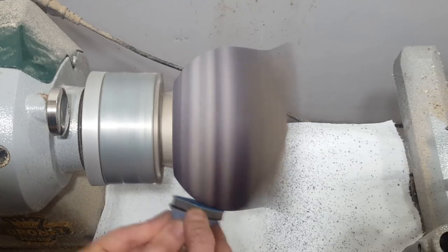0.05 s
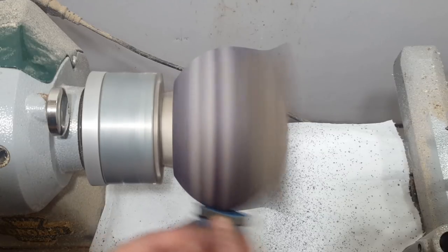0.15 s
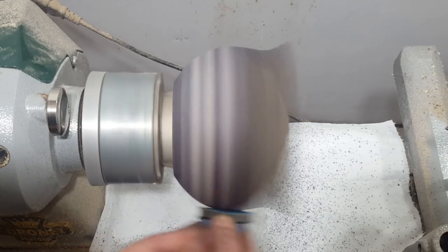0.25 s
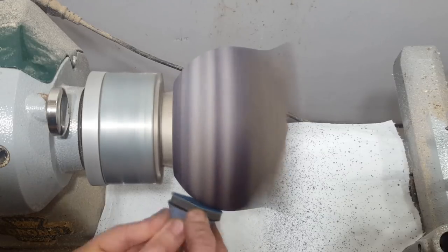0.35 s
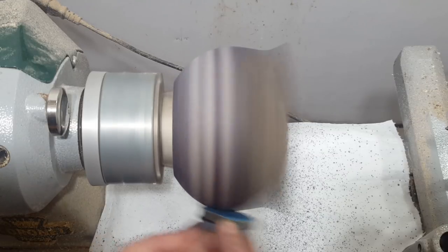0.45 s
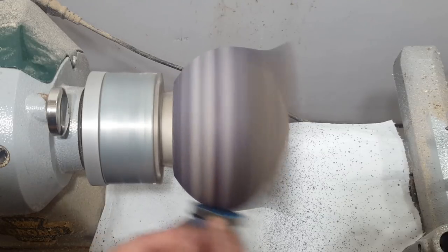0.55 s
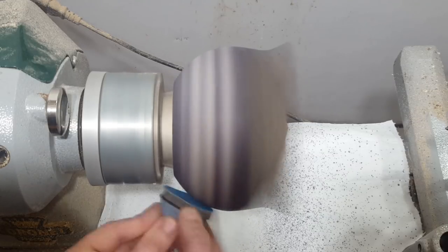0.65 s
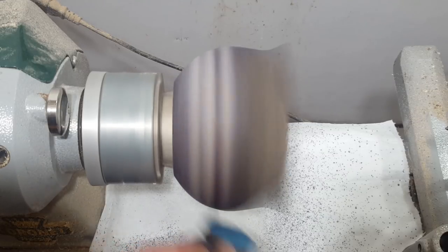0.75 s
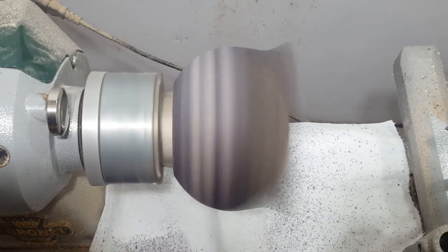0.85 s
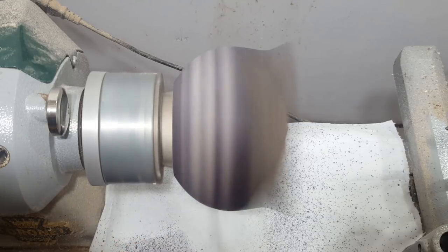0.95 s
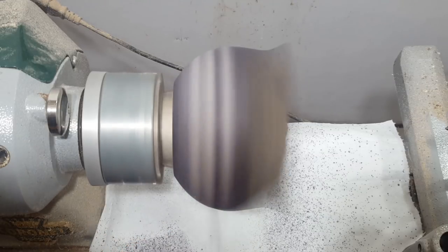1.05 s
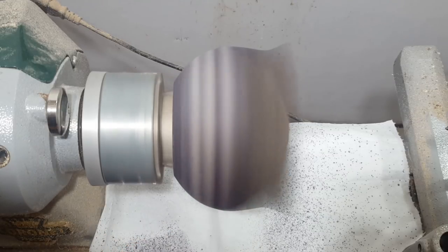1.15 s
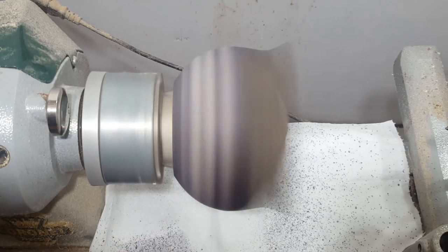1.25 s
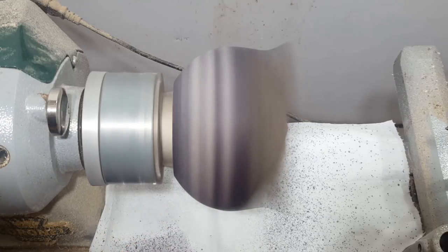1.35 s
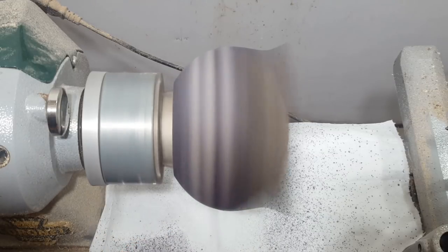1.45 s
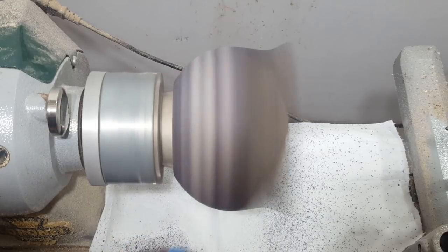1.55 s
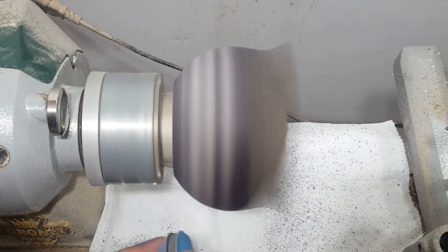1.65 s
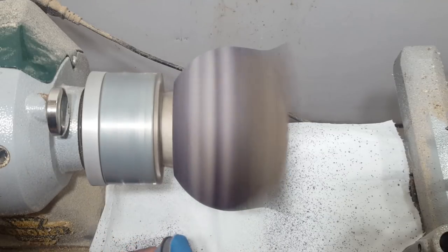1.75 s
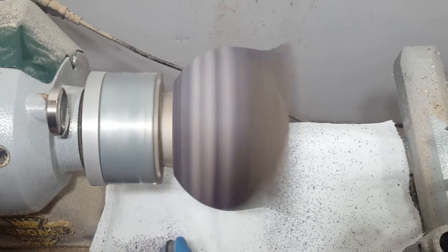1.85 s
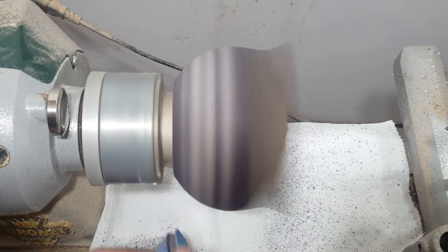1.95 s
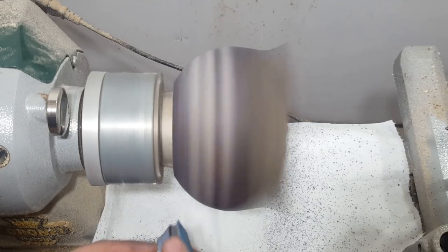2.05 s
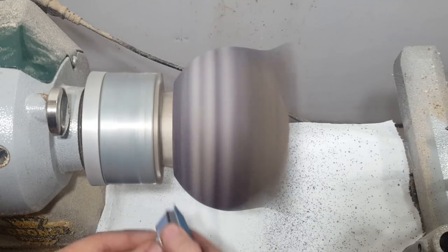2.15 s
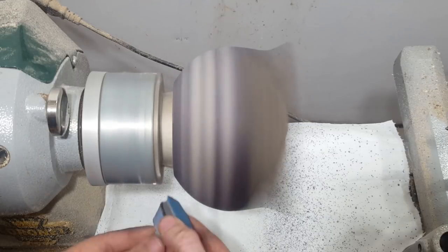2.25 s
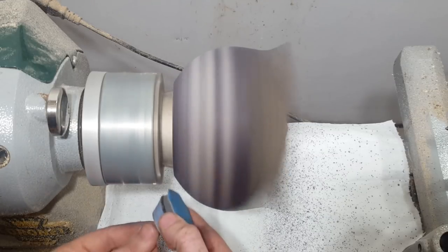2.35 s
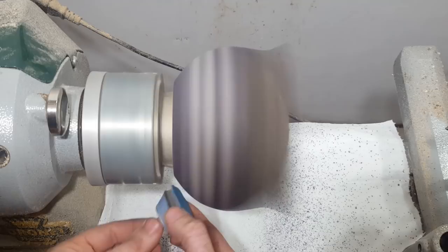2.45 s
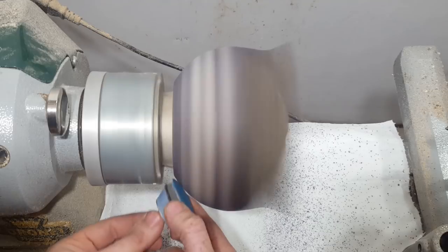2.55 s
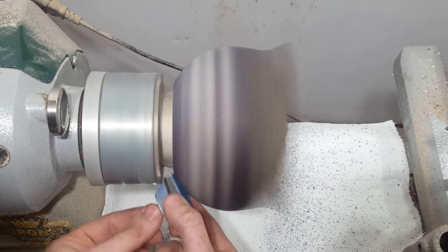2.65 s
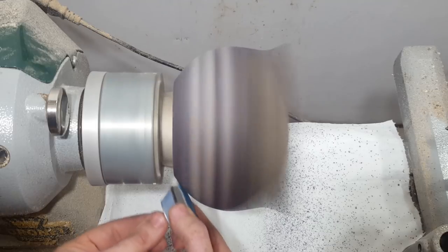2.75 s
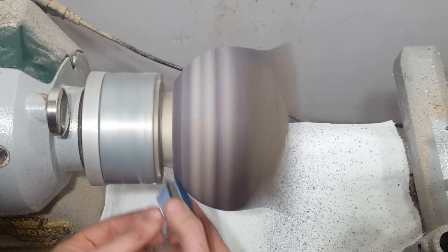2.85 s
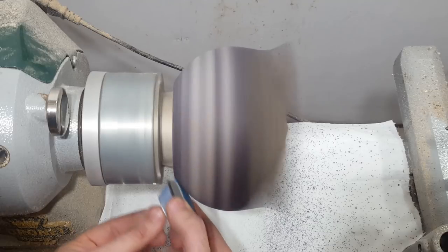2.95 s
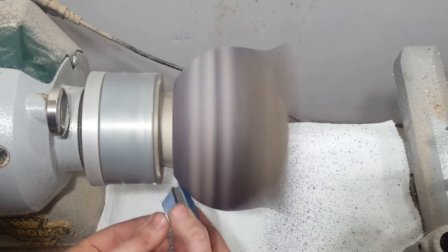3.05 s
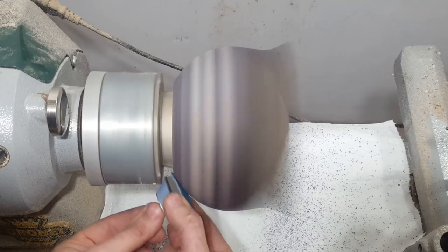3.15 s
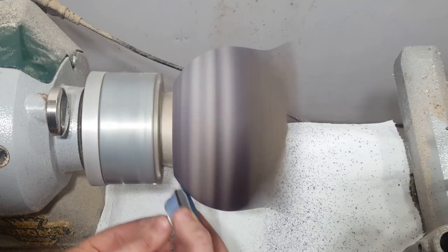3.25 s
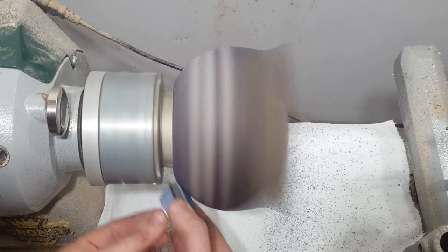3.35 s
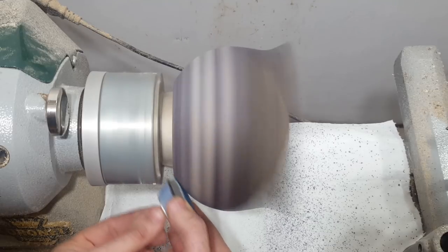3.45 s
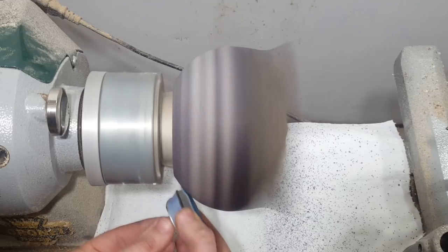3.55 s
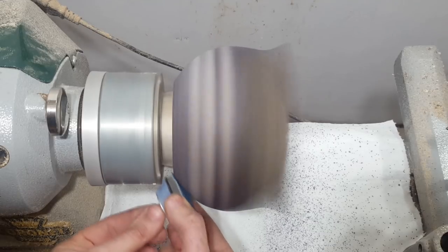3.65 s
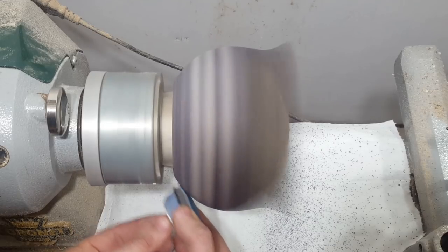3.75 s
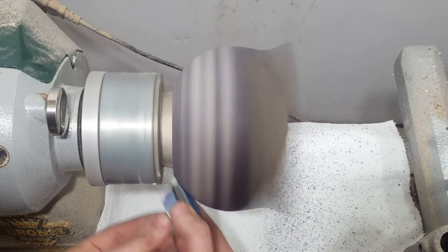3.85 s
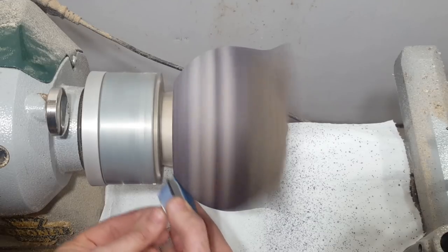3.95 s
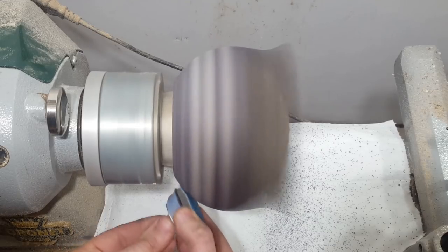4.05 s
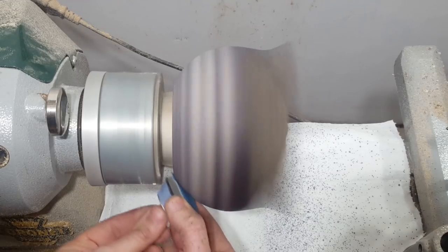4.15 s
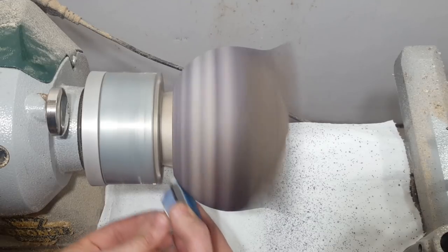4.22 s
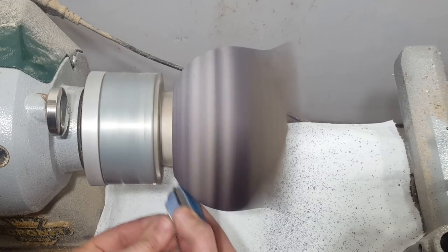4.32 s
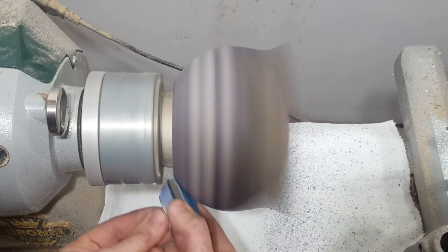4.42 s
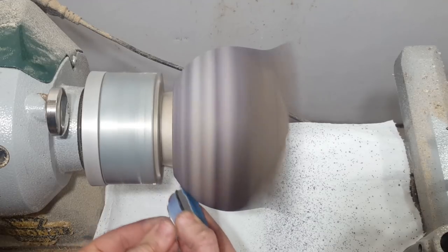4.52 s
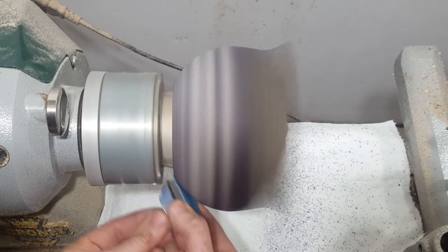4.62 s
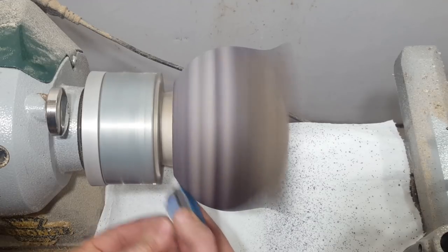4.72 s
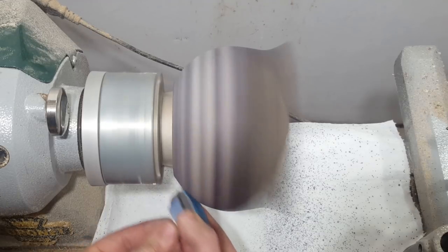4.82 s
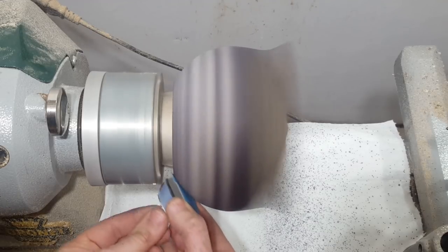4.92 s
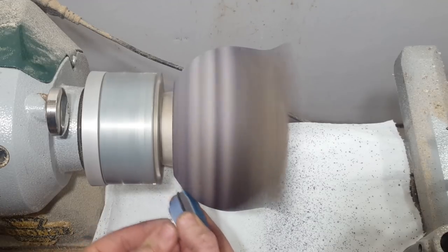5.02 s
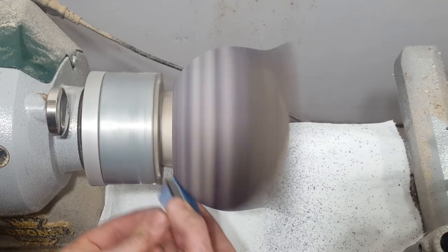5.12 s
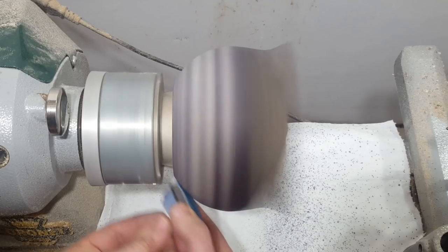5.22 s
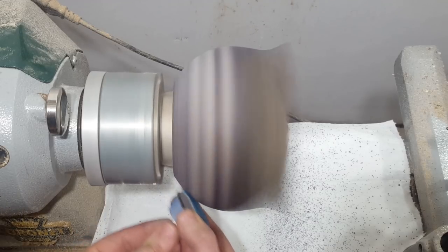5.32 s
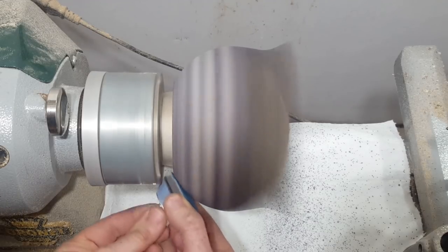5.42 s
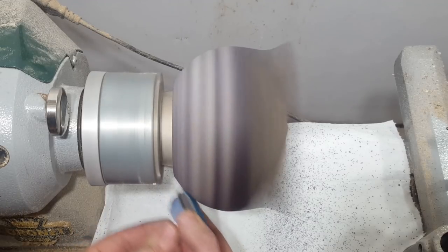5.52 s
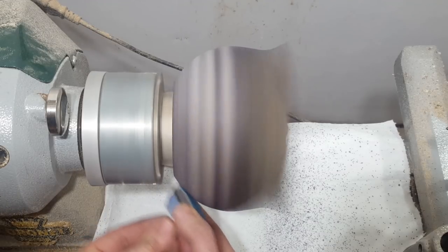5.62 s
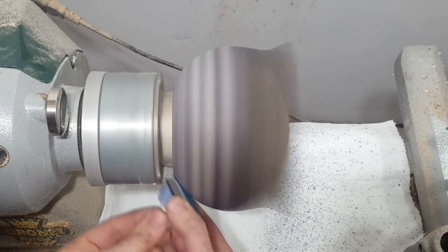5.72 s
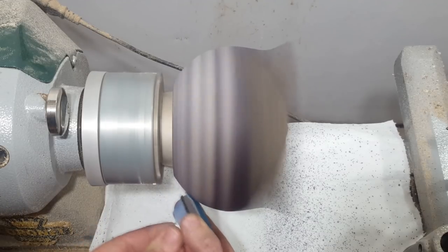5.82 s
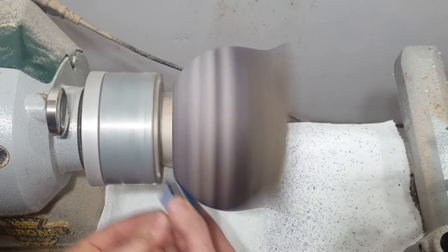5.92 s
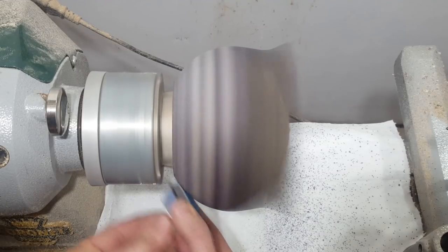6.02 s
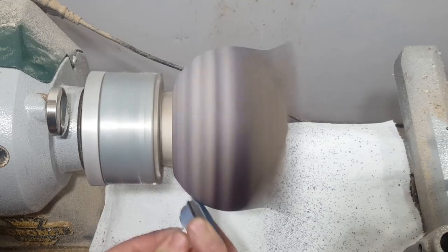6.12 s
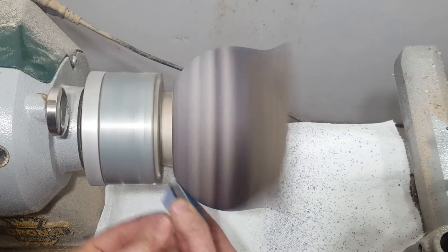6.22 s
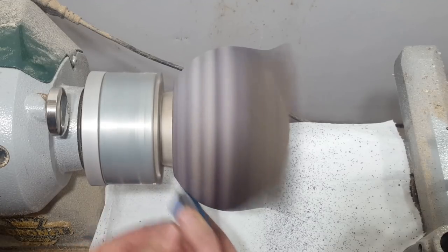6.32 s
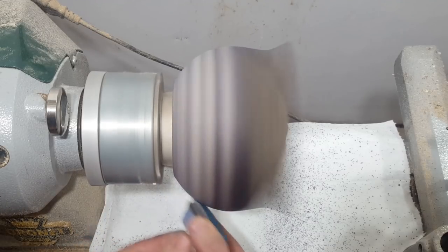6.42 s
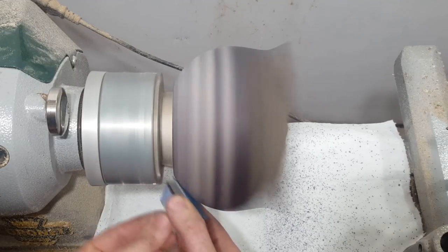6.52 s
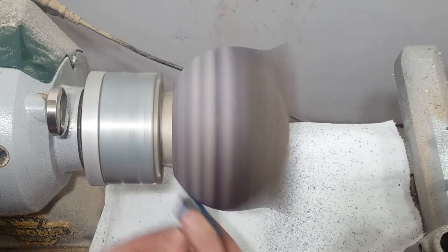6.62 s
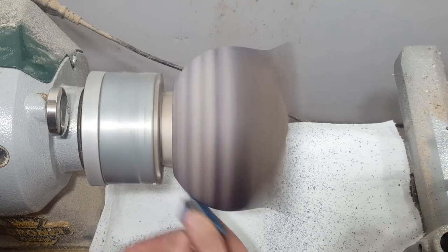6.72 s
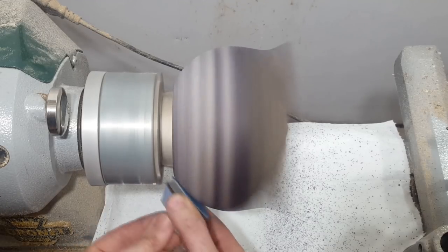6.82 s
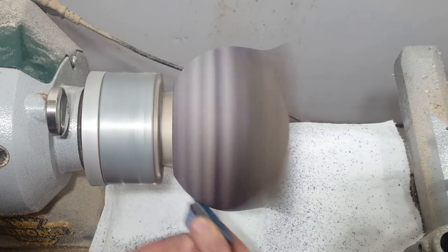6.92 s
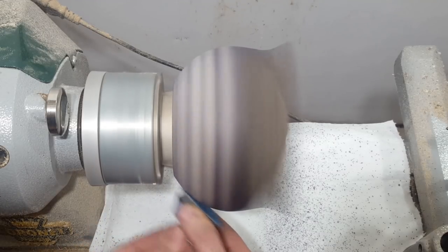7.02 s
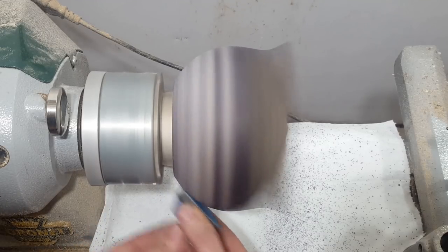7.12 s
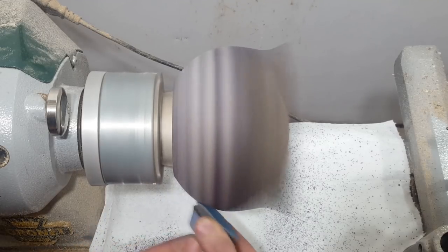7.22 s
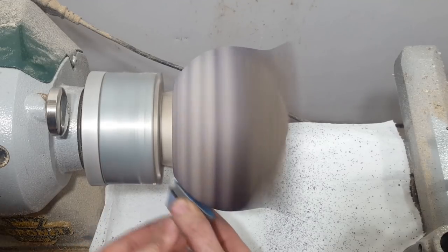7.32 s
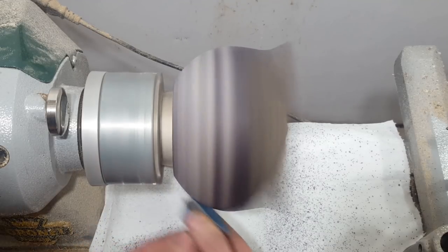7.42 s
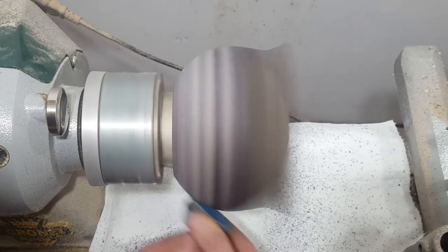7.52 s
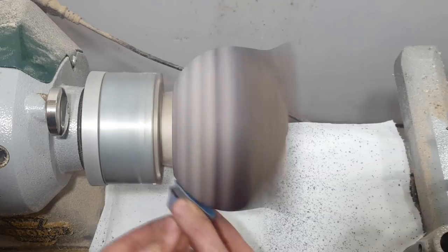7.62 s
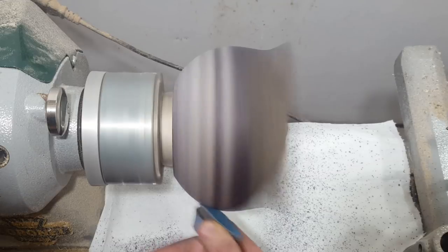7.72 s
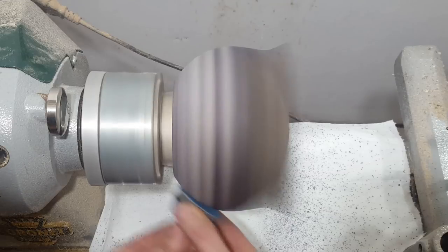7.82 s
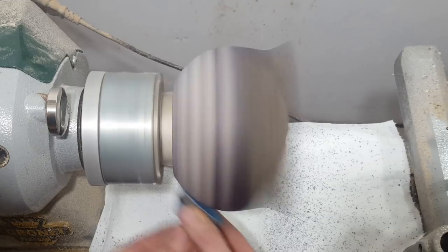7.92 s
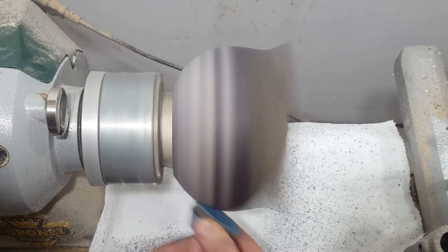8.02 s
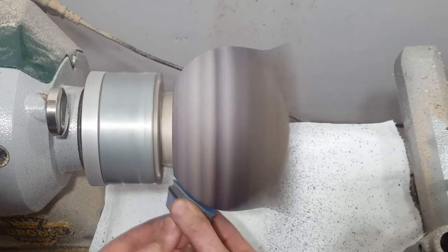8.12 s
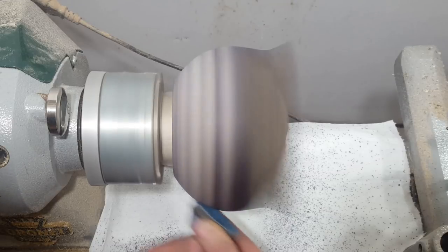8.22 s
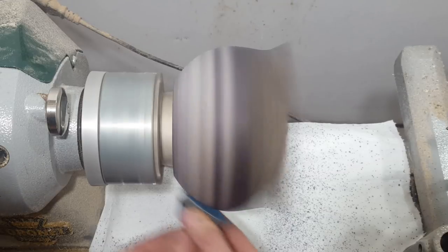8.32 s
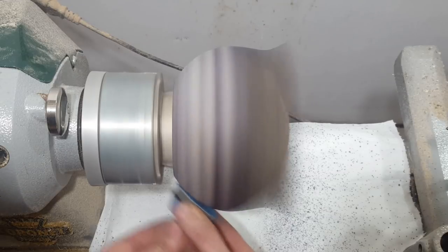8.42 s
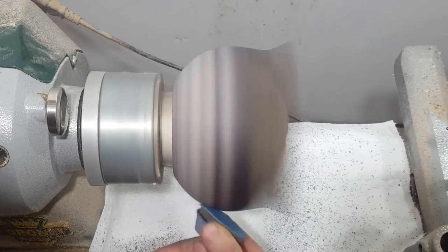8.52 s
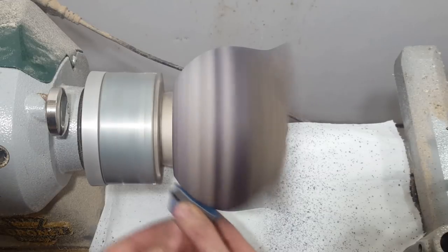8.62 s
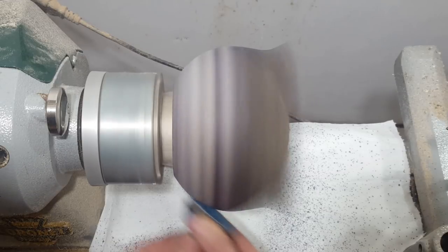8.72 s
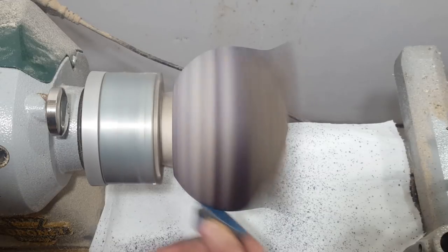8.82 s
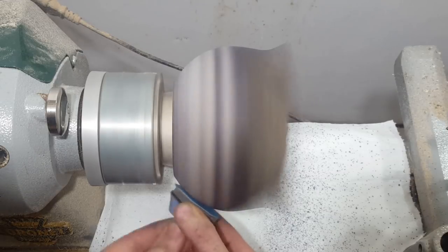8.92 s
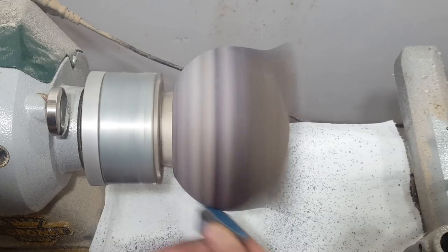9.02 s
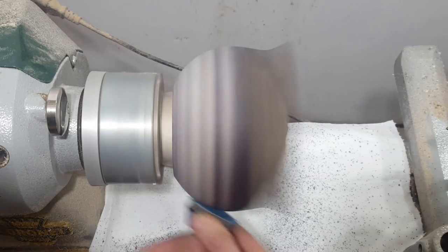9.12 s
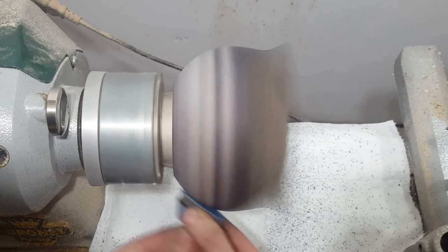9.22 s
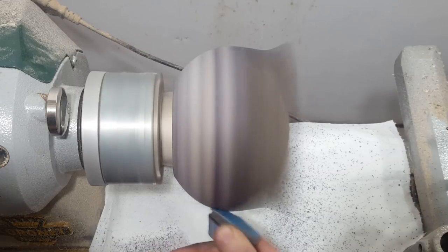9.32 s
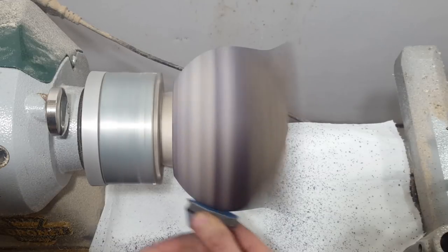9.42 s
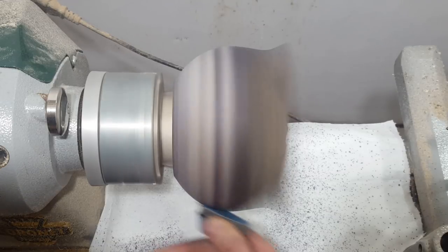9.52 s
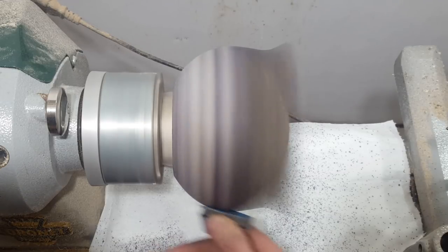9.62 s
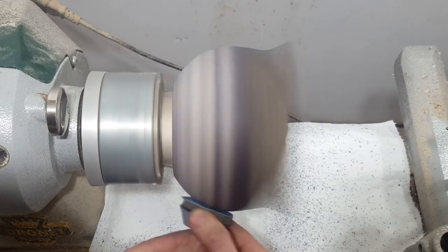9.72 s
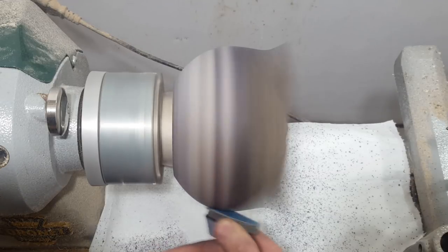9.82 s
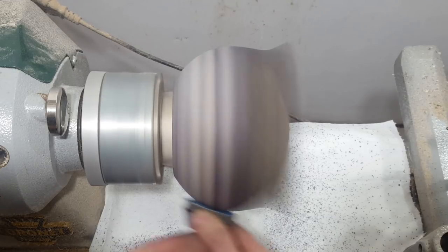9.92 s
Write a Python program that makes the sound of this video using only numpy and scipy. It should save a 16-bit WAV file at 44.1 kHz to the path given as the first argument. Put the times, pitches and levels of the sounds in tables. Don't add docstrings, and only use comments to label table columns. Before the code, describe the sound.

In a small workshop, heard close up in stereo, a lathe hums steadily with low rumble, belt and motor tones, thin whine and airy hiss. From 0 to about 0.75 seconds a sanding pad rasps on the spinning hollow wooden bowl in fast, bright, gritty strokes, with sharp catches and soft low knocks near 0.07 and 0.35. The pad lifts by 0.8, leaving the quiet machine running slightly freer. At about 2.63 it returns, snapping at 2.7 and 2.9, then strokes evenly about four times a second, each stroke swelling and fading with a fine flutter from the turning. Faint short squeaks appear from 3.7 onward. After 6.5 the rasp grows stronger and denser, with hard snaps near 6.9 and 8.9, more squeaks, slightly deeper drive pitch and rising low thrum. Faint knocks come at 8.2, 8.95 and 9.3; sanding continues to the end at about 10.

```python
import sys
import numpy as np
from scipy import signal
from scipy.fft import rfft, irfft, next_fast_len
from scipy.io import wavfile
from scipy.ndimage import uniform_filter1d, map_coordinates

SR = 44100
rng = np.random.default_rng(int(sys.argv[2]) if len(sys.argv) > 2 else 0)


def makeup_ratio(level_db):
    decades = np.asarray(level_db, float) / 20
    return 10 ** decades


def wav_out(sig):
    wavfile.write(sys.argv[1], SR, np.round(np.clip(np.atleast_2d(sig).T, -1, 1) * 32767).astype(np.int16))


N = 439236
T = np.arange(N) / SR
SIZE = next_fast_len(N + SR)
HZ = np.maximum(np.arange(SIZE // 2 + 1) * SR / SIZE, 1)

# turning point in seconds, rasp there in dB,
# place of the fastest moment in the stroke from 0 to 1, rasp at full speed in dB.
FIRST_PASS = [
    (-0.018, -47.8, 0.05, -31),
    (0.176, -34.5, 0.31, -30),
    (0.279, -35, 0.06, -29.5),
    (0.38, -34.0, 1, -33.7),
    (0.465, -37, 0.12, -29.5),
    (0.576, -38, 0.62, -28.5),
    (0.689, -38, 0.66, -38.5),
    (0.812, -75, 0.53, -47.8),
]
SECOND_PASS = [(2.631, -66, 0.44, -35), (2.875, -45, 0.43, -32.8), (3.089, -43, 0.51, -32),
               (3.338, -40.5, 0.54, -33.5), (3.622, -41.0, 0.61, -32.5), (3.847, -39.5, 0.75, -33.5),
               (4.111, -39.5, 0.59, -31.5), (4.345, -41, 0.46, -32.5), (4.611, -38, 0.46, -33),
               (4.85, -40, 0.55, -32), (5.105, -41, 0.41, -32), (5.369, -40.5, 0.56, -31.5),
               (5.603, -40, 0.62, -34), (5.908, -40, 0.54, -31), (6.16, -42, 0.47, -35.2),
               (6.499, -41, 0.43, -32), (6.75, -42.5, 0.61, -29), (7.014, -43.5, 0.55, -29.5),
               (7.27, -41.5, 0.55, -29.5), (7.553, -40, 0.49, -28.5), (7.827, -39.5, 0.49, -28),
               (8.083, -39.7, 0.34, -28.5), (8.33, -36, 0.52, -29), (8.585, -36.5, 0.67, -28),
               (8.834, -35.5, 0.85, -30.2), (9.104, -37.5, 0.66, -30.5), (9.39, -38, 0.4, -29.5),
               (9.648, -36.5, 0.28, -29), (9.923, -35.5, 0.15, -33)]
# time in seconds, left minus right in dB, pad bounce in dB.
HAND = [(0.0, -.6, -49), (.2, -0.7, -51.5), (.4, -1.6, -48.5), (.78, -1.5, -49.5), (.92, -1.2, -61),
        (1.4, -1.2, -58), (1.55, -1.2, -65.5), (2.7, -1.3, -62.5), (3.3, -1.5, -61.5), (5.0, -2, -58.5),
        (6.1, -2, -57.5), (7.2, -2.1, -55), (8.0, -1.4, -56.5), (9.2, -2.2, -51), (9.96, -1.5, -50)]
# time in seconds, peak in dB.
CATCHES = [(0.1955, -27), (0.3044, -15), (0.4353, -18), (0.4957, -14), (0.615, -16), (0.6474, -20),
           (0.6694, -31), (2.6583, -27), (2.6767, -12.5), (2.7042, -17), (2.913, -10), (2.9451, -20),
           (3.452, -17), (3.7203, -16), (3.9882, -12), (6.8864, -7), (7.64, -20), (7.6674, -20),
           (8.1268, -17), (8.9081, -7), (9.6918, -14), (9.9322, -27)]
# lobes a turn, depth in dB, phase in radians.
LOBES = [
    (1, .9, -2.2),
    (2, 1.3, 2.8),
    (3, .4, .9),
]
# frequency in Hz, level in dB per Hz.
RASP_SPECTRUM = [(590, -40), (1000, -26), (1180, -20), (1590, -14), (2580, -16.5), (3450, -12.5),
                 (3960, -14), (6500, -14.5), (7850, -2), (8320, -7), (9780, -22), (11900, -9),
                 (13400, -7.5), (15200, -3.5), (15900, -11)]
# start in seconds, peak in dB, pitch in Hz.
SQUEAKS = [(3.667, -36.5, 1790), (4.8308, -39, 1580), (6.0825, -45, 1750), (6.2394, -38, 1530),
           (7.1012, -38, 1740), (7.4618, -44, 1630), (7.7028, -41, 1520), (8.0046, -38, 2110),
           (8.1563, -41, 2130), (8.2461, -48, 1830), (8.5999, -35, 1670), (8.8876, -37, 1730),
           (9.42, -37.5, 1700)]
# start in seconds, peak in dB, pitch in Hz, 60 dB fade in seconds.
KNOCKS = [
    (.066, -39, 156, .15),
    (.347, -32, 300, 0.028),
    (.362, -34.5, 151, 0.13),
    (8.19, -43, 290, .12),
    (8.949, -47, 230, .1),
    (9.3, -40, 290, 0.1),
]
# frequency in Hz, level in dB per Hz.
BED_MODE = [(70, -25), (120, -7.5), (134, -9), (144, -17), (155, -1.5), (175, -15), (260, -15.5)]
SPINDLE_ORDERS = (2, 4, 5, 6, 8, 9, 10)
SPINDLE_DB = [-14.5, -19, -12.5, -13.5, -9, -7.5, -9]
# time in seconds, belt tooth rate in Hz.
TOOTH_RATE = [
    (0.0, 535.4),
    (0.6, 535.4),
    (0.95, 541.0),
    (2.55, 540.8),
    (2.95, 537.2),
    (6.3, 535.0),
    (8.0, 530.5),
    (9.0, 530.5),
    (10.0, 531.9),
]
MOTOR_ORDERS = (11, 12, 14, 15, 16, 17, 18, 19, 21, 22, 23, 24, 25)
# level of that multiple running free in dB, under load in dB.
MOTOR_DB = [(-77, -74), (-80, -84), (-64, -76), (-69, -72), (-63, -65), (-62, -56), (-66, -66), (-62, -63),
            (-63, -67), (-76, -77), (-71, -70), (-71, -75), (-68, -71)]
BELT_ORDERS = (5, 10, 13, 20, 24, 26, 27, 43, 45, 48, 49, 52, 55, 58, 61, 66, 72)
# level of that multiple running free in dB, under load in dB.
BELT_DB = [(-64.5, -64.5), (-77, -79), (-71, -74), (-74.5, -69), (-69.5, -69.5), (-60, -66), (-62.5, -61.5),
           (-67, -62.5), (-94, -81), (-69.5, -63), (-60, -57), (-83, -82), (-108, -93), (-68, -66),
           (-80, -89), (-70, -66), (-65, -63.5)]
# pitch in Hz, level in dB.
WHINE = [(1782, -70), (2290, -73), (5017, -77), (7106, -78), (7450, -73), (8096, -77), (11483, -88),
         (11789, -84), (11962, -82), (11994, -72), (12059, -80), (12748, -78), (12877, -79), (13130, -80),
         (14626, -80), (15294, -79), (15488, -82)]
# frequency in Hz, level in dB per Hz.
RUMBLE_SPECTRUM = [(12, -35), (20, -4), (80, -6.5), (145, -7.5), (199, -12), (283, -1.5), (340, -13),
                   (389, -18.5), (445, -2.5), (526, -1.5), (723, -12.5), (800, -6.5), (870, -13.5),
                   (1100, -11.5), (1430, -55), (2420, -120)]
# frequency in Hz, level in dB per Hz.
HISS_SPECTRUM = [(600, -30), (1000, -3), (1700, -2), (3100, -8), (4100, -14), (6500, -14), (7500, -1),
                 (8300, -5), (9000, -17), (9900, -26), (11200, -21), (12000, -12), (13800, -15),
                 (15700, -11), (15760, -60)]
# frequency in Hz, likeness from 0 to 1, left lead in radians,
# left minus right in dB.
PAD_PORTS = [(60, .96, 0, -4), (300, .93, .3, -3), (800, .4, .9, -2), (1600, .3, 1, -3), (3000, .3, 1.3, 0),
             (5500, .35, 2.1, -1), (7300, .4, 2.3, 3), (7700, .9, 0, 1), (8600, .9, 0, -2.5),
             (9500, .8, 0, 0), (10800, .82, 0, -1), (12000, .95, 0, -3.5), (16000, .95, 0, -2.5)]
LATHE_PORTS = [(60, .84, 0, -5), (300, .9, .3, -3), (800, .45, .9, -2), (2000, .35, 2, -1),
               (6000, .15, 0, 1), (7300, .55, 0, 7), (7700, .99, 0, 0), (11900, .9, 0, -2),
               (12600, .97, 0, 0), (16000, .99, 0, 0)]

MOTOR_TEETH, SPINDLE_TEETH, BELT_TEETH = 17, 32, 50


def curve(rows, at):
    where, *columns = np.transpose(rows)
    return [np.interp(at, where, column) for column in columns]


def unit(x):
    return x / np.sqrt(np.mean(x ** 2))


def walk(rate_hz):
    hold = int(SR / rate_hz)
    steps = np.repeat(rng.standard_normal(N // hold + 1), hold)
    slewed = uniform_filter1d(uniform_filter1d(steps, hold), hold)
    return unit(slewed[:N])


def colour(x, spectrum, lo_hz=1, hi_hz=30000):
    hz, db = np.transpose(spectrum)
    shape = makeup_ratio(np.interp(np.log(HZ), np.log(hz), db))
    edges = np.sqrt((1 + (lo_hz / HZ) ** 12) * (1 + (HZ / hi_hz) ** 12))
    return unit(irfft(rfft(x, SIZE) * shape / edges, SIZE)[:N])


def hum(turns, orders, levels_db, wobble_db):
    out = np.zeros(N)
    for order, db in zip(orders, levels_db):
        level = np.sqrt(2) * makeup_ratio(db + wobble_db * walk(3))
        out += level * np.sin(2 * np.pi * (order * turns + rng.random()))
    return out


def sanding(level):
    since = T - SECOND_PASS[0][0]
    unseated = (since > 0) * np.exp(-np.abs(since) / 0.88)
    swell_db = swell()
    bounce_db = curve(HAND, T)[1] + 53.5
    fine_db = 0.9 + (0.54 - 1) * swell_db - 4.2 * unseated
    wall_db = -10 + (0.26 - 1) * swell_db - 8 * unseated - 0.21 * bounce_db
    tear = grit(7000., 1.3, 1.2)
    rasp = colour(tear, RASP_SPECTRUM, lo_hz=6000, hi_hz=9560)
    fine = makeup_ratio(fine_db + .5 * walk(60)) * colour(tear, RASP_SPECTRUM, lo_hz=10500)
    wall = makeup_ratio(wall_db + 1.4 * walk(40)) * colour(tear, RASP_SPECTRUM, hi_hz=5130)
    return level * (rasp + fine + wall)


def grit(rate_hz, spread_db, bed):
    hit = rng.random(N) < rate_hz / SR
    size = rng.exponential(1, N)
    polarity, dust = rng.standard_normal((2, N))
    return unit(hit * makeup_ratio(spread_db * size) * polarity) + bed * dust


def pressure(spindle):
    lobes_db = sum(db * np.cos(2 * np.pi * lobes * spindle + phase) for lobes, db, phase in LOBES)
    pulse = makeup_ratio(.9 * lobes_db + .8 * walk(220))
    press = unit(pulse * (1 + .17 * snags(120., .005)))
    catch = sum((T >= s) * makeup_ratio(db - 24.0) * np.exp(-np.abs(T - s) / 0.0055) for s, db in CATCHES)
    return contact() * makeup_ratio(strokes()) * press + catch


def snags(rate_hz, fade_s):
    bites = (rng.random(N) < rate_hz / SR) * rng.exponential(1, N)
    return signal.lfilter([1], [1, -np.exp(-1 / (fade_s * SR))], bites)


def strokes():
    turn_s, turn_db, place, fast_db = np.vstack([FIRST_PASS, SECOND_PASS]).T
    turn_s = np.append(turn_s, turn_s[-1] + 0.27)
    turn_db = np.append(turn_db, turn_db[-1])
    fastest_s = turn_s[:-1] + np.clip(place, .05, .95) * np.diff(turn_s)
    moments = np.sort(np.append(turn_s, fastest_s))
    half = np.interp(T, moments, np.arange(len(moments)))
    k = np.minimum(half.astype(int), len(moments) - 2)
    speed = np.sin(np.pi / 2 * (1 - np.abs(half % 2 - 1))) ** 1.6
    slow_db = turn_db[(k + 1) // 2]
    return slow_db + (fast_db[k // 2] - slow_db) * speed


def swell():
    mean_db, faint_db = -35, -46
    return np.maximum(strokes(), faint_db) - mean_db


def contact():
    touching = (T < FIRST_PASS[-1][0]) | (T > SECOND_PASS[0][0])
    return uniform_filter1d(1. * touching, size=300)


def squeaks():
    out = np.zeros(N)
    age = np.arange(int(.06 * SR)) / SR
    for s, db, hz in SQUEAKS:
        resonance = signal.butter(2, [hz - 170, hz + 170], "bandpass", fs=SR, output="sos")
        rub = signal.sosfilt(resonance, rng.standard_normal(4000))[-len(age):]
        swell_and_fade = age / 0.011 * np.exp(1 - age / 0.0087)
        out[int(s * SR):][:len(age)] += makeup_ratio(db - 7) * unit(rub) * swell_and_fade
    return out


def thrum(spindle):
    thrum_db = curve(HAND, T)[1] + 0.32 * contact() * swell() + 1.65 * walk(5)
    bed = colour(rng.standard_normal(N), BED_MODE, hi_hz=343)
    shake = hum(spindle, SPINDLE_ORDERS, SPINDLE_DB, 3.1)
    return makeup_ratio(thrum_db) * (shake + makeup_ratio(-4.5) * bed) + knocks()


def knocks():
    out = np.zeros(N)
    for s, db, hz, t60 in KNOCKS:
        start = int(s * SR)
        age = np.arange(min(int(t60 * SR), N - start)) / SR
        out[start:][:len(age)] += makeup_ratio(db - 60 * age / t60) * np.sin(2 * np.pi * hz * age)
    return out


def drive(teeth, load):
    motor = teeth / MOTOR_TEETH
    motor_db = [free + (held - free) * load for free, held in MOTOR_DB]
    belt_db = [free + (held - free) * load for free, held in BELT_DB]
    tones = hum(motor, MOTOR_ORDERS, motor_db, 1.26) + hum(teeth / BELT_TEETH, BELT_ORDERS, belt_db, 1.7)
    beat = 1 + 0.35 * np.cos(2 * np.pi * motor) + 0.28 * np.cos(4 * np.pi * motor)
    return tones + makeup_ratio(2.0) * beat * hum(T, *np.transpose(WHINE), 2.1)


def lathe(teeth, load):
    rumble_level = makeup_ratio(-54 + 1.5 * load + .7 * walk(4))
    rumble = rumble_level * colour(rng.standard_normal(N), RUMBLE_SPECTRUM)
    hiss = makeup_ratio(-56.5 + 1.0 * walk(6)) * colour(rng.standard_normal(N), HISS_SPECTRUM)
    bearings = makeup_ratio(-61) * colour(repeating(teeth / MOTOR_TEETH, 9.0), HISS_SPECTRUM, lo_hz=1320)
    return rumble + hiss + bearings


def repeating(turns, renew_turns):
    phases = rng.random((int(turns[-1] / renew_turns) + 3, 520))
    patterns = irfft(np.exp(2j * np.pi * phases), 8192)
    row = (turns / renew_turns).astype(int)
    place = turns % 1 * 8191
    share = turns / renew_turns % 1 * np.pi / 2
    old = map_coordinates(patterns, [row, place], order=1)
    new = map_coordinates(patterns, [row + 1, place], order=1)
    return np.cos(share) * old + np.sin(share) * new


def fading_noise(t60):
    age = np.arange(int(.07 * SR)) / SR
    return rng.standard_normal(len(age)) * makeup_ratio(-60 * age / t60)


def ports(takes, table, pan_db=0):
    log_table = [(np.log(hz), *rest) for hz, *rest in table]
    like, lead, balance_db = curve(log_table, np.log(HZ))
    like = np.clip(like, 0, 1)
    echo = fading_noise(.068)
    bench = 1 + makeup_ratio(-8) * rfft(echo / np.linalg.norm(echo), SIZE) / (1 + (1320 / HZ) ** 4)
    direct, out = rfft(takes[0], SIZE), []
    for side, far in zip((1, -1), takes[1:]):
        walls = rfft(fading_noise(.07), SIZE)
        smear = walls / np.abs(walls)
        near = np.sqrt(like) * np.exp(.5j * side * lead) * direct
        scattered = np.sqrt(1 - like) * smear * rfft(far, SIZE)
        heard = bench * (near + scattered) * makeup_ratio(side * balance_db / 2)
        out.append(irfft(heard, SIZE)[:N] * makeup_ratio(side * pan_db / 2))
    return np.array(out)


def scene():
    tooth_hz = curve(TOOTH_RATE, T)[0]
    teeth = np.cumsum(tooth_hz) / SR
    load = np.clip((541 - tooth_hz) / 10, 0, 1)
    spindle = teeth / SPINDLE_TEETH
    level = pressure(spindle)
    pad = [sanding(level) + squeaks() for path in range(3)]
    head = lathe(teeth, load) + drive(teeth, load) + thrum(spindle)
    machine = [head, lathe(teeth, load), lathe(teeth, load)]
    return ports(pad, PAD_PORTS, curve(HAND, T)[0]) + ports(machine, LATHE_PORTS)


def top_cut(x):
    return signal.sosfilt(signal.butter(12, 16000, fs=SR, output="sos"), x)


def record(dry):
    top_edge = np.sin(np.pi / 2 * np.clip((15810 - HZ) / 90, 0, 1)) ** 2
    edged = irfft(rfft(dry, SIZE) * top_edge, SIZE)[:, :N]
    return top_cut(edged - .0006)


dry = scene()
out = record(dry)
wav_out(out)
```